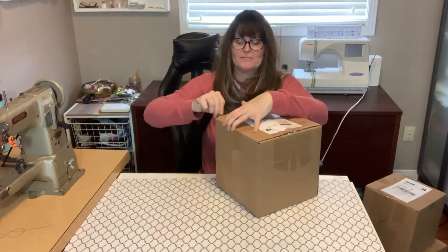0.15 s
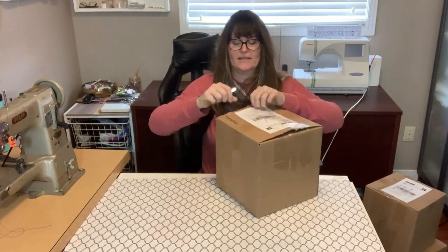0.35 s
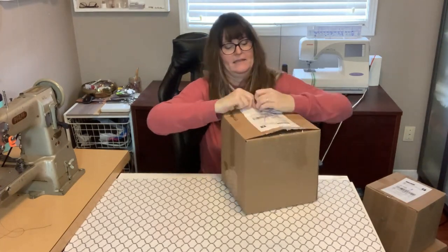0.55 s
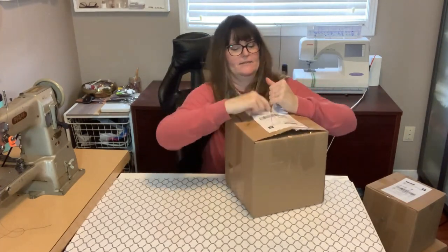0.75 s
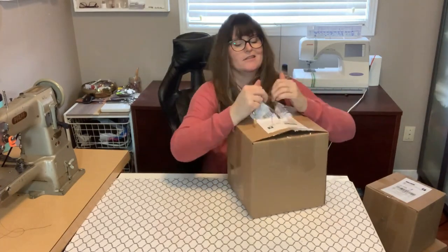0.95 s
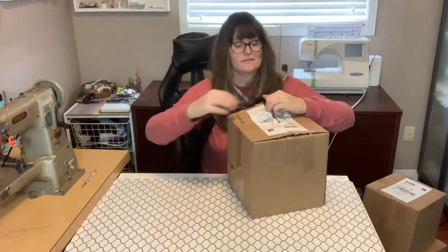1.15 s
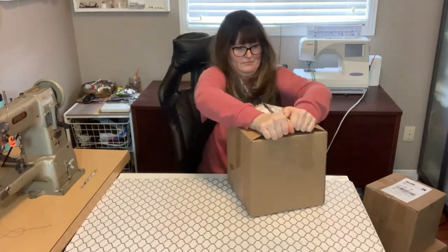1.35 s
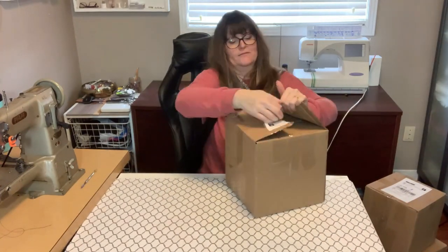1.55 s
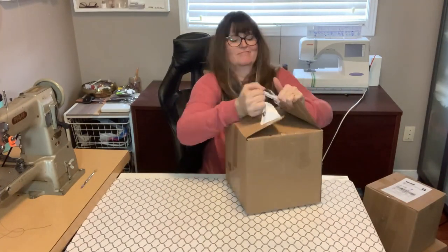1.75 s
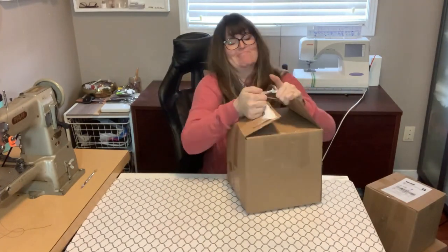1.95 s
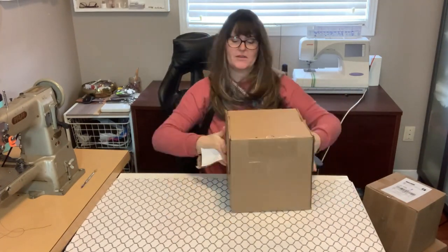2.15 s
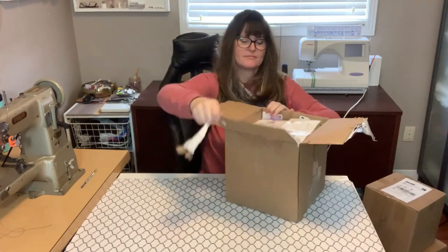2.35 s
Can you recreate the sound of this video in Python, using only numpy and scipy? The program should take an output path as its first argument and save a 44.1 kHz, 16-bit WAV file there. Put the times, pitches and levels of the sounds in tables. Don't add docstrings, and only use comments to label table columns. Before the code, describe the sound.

Close, dry indoor sound of tape being slit and ripped from a carton, with uneven crackles, short squeaks, sharp pops that lightly knock the box, and hands rubbing cardboard, heard through a stereo laptop microphone.

```python
import sys
import numpy as np
from scipy import signal
from scipy.fft import rfft, irfft
from scipy.io import wavfile
from scipy.ndimage import uniform_filter1d

SR = 44100
rng = np.random.default_rng(int(sys.argv[2]) if len(sys.argv) > 2 else 0)


def level_to_linear(level):
    exponent = np.asarray(level, float) / 20
    return 10 ** exponent


def unload_audio(sound):
    columns = np.transpose(np.atleast_2d(sound))
    steps = np.round(np.clip(columns, -1, 1) * 32767)
    wavfile.write(sys.argv[1], SR, steps.astype(np.int16))


N = 110250
TOP_HZ = 16050

# f/Hz, level/dB per Hz
FILM_SPECTRUM = [(24, -4), (40, -3), (1110, -3), (1700, -1), (2030, -3.5), (2810, 0.5), (7460, -1.5),
                 (14700, -0.5), (15800, -4.5)]


def on_log(table, hz):
    f, v = np.array(table, float).T
    return np.interp(np.log(np.maximum(hz, 1)), np.log(np.maximum(f, 1)), v)


def colour(x, table):
    cepstrum = irfft(np.log(level_to_linear(on_log(table, np.fft.rfftfreq(1024, 1 / SR)))))
    cepstrum[1:512] *= 2
    cepstrum[513:] = 0
    response = irfft(np.exp(rfft(cepstrum)))
    response /= np.sqrt(np.sum(response ** 2))
    return signal.fftconvolve(x, response[None])[:, :N]


def walk(rate):
    hold = int(SR / rate)
    levels = np.repeat(rng.standard_normal(N // hold + 1), hold)
    return 1.3 * uniform_filter1d(uniform_filter1d(levels, hold), hold)[:N]


def grit(spread_db):
    releases = rng.standard_normal((3, N)) * level_to_linear(spread_db * rng.exponential(size=N))
    return releases / np.sqrt(np.mean(releases ** 2))


def swell(t, start, length, edge):
    ramp = np.minimum(2 * (t - start), start + length - t) / (edge * length)
    return np.clip(ramp + 0.5, 0, 1) ** 2


def box_thud(strike, t):
    # f/Hz, level/dB, t60/s
    box_modes = [(674, 2, 0.039), (880, 12.5, 0.016), (2500, 23.5, 0.015), (3500, 17, 0.015)]
    u = t[:4096]
    ring = sum(level_to_linear(db - 60 * u / t60) * np.sin(2 * np.pi * hz * u) for hz, db, t60 in box_modes)
    ring /= np.sqrt(np.sum(ring ** 2))
    return signal.fftconvolve(strike, ring[None])[:, :N]


def snaps(t):
    # t/s, peak level/dB, ring t60/s, box thud level/dB, bass level/dB
    cracks = [(.499, -7.5, 0.038, -18, -4), (0.502, -9.5, 0.028, -35, -15), (0.74, -15, 0.034, -22, 4.5),
              (0.7606, -16.5, 0.022, -31, -5), (0.94, -2, 0.0092, -22, -6), (0.9701, -6, 0.0098, -22, -0.5),
              (0.9895, -7, 0.03, -29, 0.5), (1.008, -8.5, 0.021, -22, -5), (1.3205, -10.5, 0.019, -36, -3),
              (1.3232, -11.5, 0.028, -16, 1), (1.456, -6, 0.026, -16.5, -0.5), (1.866, -7.5, 0.019, -16, 0),
              (1.8669, -4.5, 0.028, -28, -4), (2.1077, -3.5, 0.02, -30, -4), (2.211, -15, 0.021, -13, 1),
              (2.236, -21.5, 0.04, -28, -6)]
    # t/s, peak level/dB
    small_snaps = [(0.002, -29), (0.1, -35.5), (0.181, -21), (0.208, -33), (0.217, -28), (0.235, -22),
                   (0.319, -19.5), (0.337, -26.5), (0.406, -23), (0.454, -18), (0.571, -26.5), (0.58, -24.5),
                   (0.599, -15), (0.698, -21.5), (0.773, -24.5), (0.780, -15), (0.855, -27), (0.9735, -11.5),
                   (1.216, -24.5), (1.246, -32), (1.254, -23), (1.302, -31.5), (1.408, -33), (1.429, -32.5),
                  (1.53, -31.5), (1.502, -28), (1.512, -22), (1.5791, -23.5), (1.6464, -28.5),
                  (1.7778, -29), (1.809, -28), (1.851, -27), (1.907, -26.5), (1.979, -25), (2.241, -19.5),
                  (2.326, -28.5), (2.343, -29.5), (2.371, -31),
                   (0.915, -35), (0.9256, -17), (0.935, -12), (0.962, -15), (0.986, -11), (1.0021, -17),
                  (1.451, -30), (1.707, -35), (1.731, -22), (1.828, -24), (2.227, -21.5), (2.106, -21)]
    small_t60_s, small_thud_db = 0.027, -23
    snap_db, tick_db, tick_s, rise_s = -5.5, 0, 0.00025, 0.00064
    bass_hz = 450

    small = [(s, db, small_t60_s, small_thud_db, 0) for s, db in small_snaps]
    film_power, knock_power, bass_power = np.zeros((3, N))
    for s, db, t60, box_db, bass_db in cracks + small:
        u = np.maximum(t - s, 0)
        ring = level_to_linear(-60 * u / max(t60, 0.004)) + level_to_linear(tick_db) * np.exp(-u / tick_s)
        env = level_to_linear(db + snap_db) * (1 - np.exp(-u / rise_s)) * ring
        film_power += env ** 2
        bass_power += (env * level_to_linear(bass_db)) ** 2
        knock_power += (env * level_to_linear(box_db)) ** 2

    burst = grit(spread_db=3.0)
    film = np.sqrt(film_power) * burst
    thud = box_thud(np.sqrt(knock_power) * burst, t)
    low_pass = signal.butter(2, bass_hz, fs=SR, output="sos")
    bass_change = signal.sosfiltfilt(low_pass, np.sqrt(bass_power) * burst - film)
    return colour(film + bass_change, FILM_SPECTRUM) + thud


def scratches(t):
    # t/s, length/s, level/dB
    peels = [(0, 0.095, -50), (0.197, 0.041, -45.5), (0.25, 0.018, -36.5), (0.261, 0.041, -48),
             (0.411, 0.037, -60.5), (0.451, 0.031, -41), (0.518, .07, -57), (0.633, 0.034, -49.5),
             (.7, 0.04, -45.5), (0.739, 0.041, -34.5), (0.843, 0.045, -44), (0.926, 0.026, -33.5),
             (0.942, 0.083, -38.5), (1.034, 0.029, -39.5), (1.063, 0.049, -45), (1.113, 0.028, -35),
             (1.156, 0.056, -40), (1.255, 0.067, -50.5), (1.339, 0.029, -46.5), (1.391, 0.045, -48.5),
             (1.593, 0.027, -40), (1.606, 0.14, -51), (1.706, 0.044, -33.5), (1.747, .035, -46.5),
             (1.789, 0.082, -43), (1.892, 0.21, -44.5), (2.115, .012, -42), (2.143, 0.024, -37),
             (2.13, 0.099, -49.5), (2.256, 0.02, -44.5)]
    env = np.sqrt(sum((level_to_linear(db) * swell(t, s, length, 0.47)) ** 2 for s, length, db in peels))
    return colour(env * level_to_linear(2.9 * walk(220)) * grit(spread_db=2.3), FILM_SPECTRUM)


def squeaks(t):
    # t/s, length/s, start f/Hz, end f/Hz, level/dB
    soft_squeaks = [(.234, 0.009, 2900, 2800, -36.5), (.718, 0.016, 2950, 2500, -46),
                    (.862, 0.03, 2500, 2120, -45.5), (1.037, 0.013, 2800, 3560, -34.5),
                    (1.062, 0.014, 2740, 2280, -39.5), (1.115, 0.017, 3500, 3830, -35),
                    (1.145, 0.011, 2500, 2450, -40.5), (1.165, 0.013, 3400, 3130, -32.5),
                    (1.195, 0.017, 2340, 2330, -37.5), (1.585, .009, 2956, 3090, -33),
                    (2.256, 0.022, 2400, 2130, -47.5), (2.24, 0.0062, 1800, 1840, -32)]
    # t/s, length/s, start f/Hz, end f/Hz, level/dB
    taut_squeaks = [
        (.2515, 0.012, 2783, 2465, -25.5),
        (.263, 0.0099, 2565, 2500, -43),
        (.702, 0.016, 2827, 2974, -24),
        (1.0815, 0.0073, 3125, 3230, -31.5),
        (1.097, 0.008, 3160, 3030, -30.5),
        (1.126, 0.012, 3500, 2410, -30),
        (1.18, .014, 3020, 2400, -31),
        (1.592, 0.0063, 3056, 3040, -25.5),
        (2.158, 0.01, 2470, 2500, -35.5),
    ]
    # t/s, length/s, start f/Hz, end f/Hz, level/dB
    shrill_squeaks = [
        (.214, 0.013, 3140, 3140, -38),
        (.454, 0.011, 2690, 2620, -25.5),
        (1.597, 0.011, 2710, 2800, -28),
        (2.2375, 0.0069, 2575, 2780, -22.5),
        (2.244, 0.0052, 2780, 2770, -24),
    ]
    soft_db = [0, -7, -15, -18, -22]
    taut_db = [-10, 0, -11, -9, -13]
    shrill_db = [-10, -9, 0, -12, -14]
    arch, wobble = 0.07, 0.014
    rough, rough_hz = 0.72, 550

    out = np.zeros((3, N))
    jitter = 1 + wobble * walk(700)
    rates = rough_hz * np.sqrt(np.arange(1, 6))
    unsteady = np.array([[walk(hz) + 1j * walk(hz) for _ in range(3)] for hz in rates]) / np.sqrt(2)
    steady = np.exp(1j * np.array([[0], [1], [-1]]))
    slip = (steady + rough * unsteady) / np.hypot(1, rough)

    kinds = ((soft_squeaks, soft_db), (taut_squeaks, taut_db), (shrill_squeaks, shrill_db))
    for rows, partial_levels in kinds:
        for s, length, start_hz, end_hz, db in rows:
            i = slice(int(max(s - length / 2, 0) * SR), int((s + length + length / 2) * SR))
            u = np.clip((t[i] - s) / length, 0, 1)
            glide = start_hz + (end_hz - start_hz) * u
            hz = glide * (1 + arch * (np.sin(np.pi * u) - 0.5)) * jitter[i]
            phase = 2 * np.pi * np.cumsum(hz) / SR
            env = swell(t[i], s, length, 0.35)
            for k, partial_db in enumerate(partial_levels):
                if (k + 1) * max(start_hz, end_hz) < TOP_HZ:
                    tone = np.imag(slip[k, :, i] * np.exp(1j * (k + 1) * phase))
                    out[:, i] += level_to_linear(db + partial_db) * env * tone
    return out


def rasps(t):
    # t/s, length/s, start f/Hz, end f/Hz, level/dB
    hoarse_squeals = [(.021, 0.033, 3200, 3700, -45.5), (.260, 0.013, 3010, 2400, -36),
                      (.273, 0.012, 3430, 3580, -36), (1.907, 0.0092, 2550, 2480, -42),
                      (.719, 0.0077, 2770, 2600, -49), (.727, 0.014, 3700, 4300, -44),
                      (1.018, .014, 3500, 3100, -45.5), (1.082, 0.025, 3230, 2880, -37),
                      (1.172, 0.018, 930, 800, -50), (1.61, 0.017, 2980, 2800, -63),
                      (1.682, 0.0044, 3260, 3120, -47), (1.723, 0.014, 4080, 3920, -27),
                      (1.725, 0.0097, 3500, 3500, -32), (1.736, 0.008, 3600, 3100, -45),
                      (2.109, .006, 890, 740, -31), (2.12, 0.015, 734, 620, -49.5),
                      (2.143, .007, 6100, 6200, -39), (2.143, 0.0093, 8200, 7760, -31),
                      (2.262, 0.0085, 6300, 6100, -42), (2.23, 0.0061, 763, 645, -46.5)]
    # t/s, length/s, start f/Hz, end f/Hz, level/dB
    broad_rasps = [(.032, 0.013, 5270, 5630, -43.5), (.046, .012, 5600, 6000, -54),
                   (.204, 0.017, 6100, 8560, -36), (.208, 0.017, 11600, 12500, -36),
                   (.291, 0.015, 3950, 3570, -43.5), (.7405, 0.0047, 3340, 3080, -30),
                   (.7615, 0.0027, 3300, 2900, -29.5), (1.456, 0.0049, 2900, 2560, -27.5),
                   (1.036, .016, 8600, 9350, -34), (1.036, .015, 13000, 13000, -30.5),
                   (1.036, .007, 5200, 6000, -42), (1.083, 0.0079, 12800, 11500, -47),
                   (1.146, 0.011, 12500, 12500, -36), (1.166, 0.033, 9900, 8900, -41.5),
                   (1.592, 0.021, 12000, 13000, -32.5), (1.65, 0.076, 2970, 3400, -56),
                   (1.703, 0.012, 5100, 5970, -35), (1.707, 0.035, 12100, 13000, -39),
                   (2.108, 0.0044, 3500, 3060, -20.5), (2.26, .014, 4340, 3600, -44.5)]
    hoarse_share, rasp_share = 0.1, 0.29

    out, noise = np.zeros((3, N)), grit(spread_db=2.0)
    for rows, share in ((hoarse_squeals, hoarse_share), (broad_rasps, rasp_share)):
        for s, length, start_hz, end_hz, db in rows:
            i = slice(int(max(s - length - 0.01, 0) * SR), int((s + 2 * length) * SR))
            hz = start_hz + (end_hz - start_hz) * np.clip((t[i] - s) / length, 0, 1)
            carrier = np.exp(2j * np.pi * np.cumsum(hz) / SR)
            half_hz = share * (start_hz + end_hz) / 4 + 70
            low_pass = signal.butter(2, half_hz, fs=SR, output="sos")
            band = np.real(carrier * signal.sosfilt(low_pass, noise[:, i] / carrier))
            out[:, i] += level_to_linear(db) * np.sqrt(SR / half_hz) * swell(t[i], s, length, 0.45) * band
    return out


def rustle(t):
    # t/s, level/dB
    handling = [(.11, -65), (.138, -76), (.146, -63), (.175, -62), (.3, -54), (.37, -65.5), (.5, -56.5),
                (.8, -46), (.835, -59), (.9, -52), (1.23, -53.5), (1.35, -55.5), (1.375, -66),
                (1.44, -50.5), (2.06, -77), (2.09, -55.5), (2.3, -51), (2.5, -53.5)]
    # f/Hz, level/dB per Hz
    rustle_spectrum = [(18, -59), (30, -4), (1870, -0.5), (2190, 2), (2770, 2), (4310, 0.5), (5580, -0.5),
                       (15000, -4.5)]
    s, db = np.array(handling).T
    flicker_db = 0.46 * walk(60) + 2.8 * walk(250)
    rubbing = colour(level_to_linear(np.interp(t, s, db) + flicker_db) * grit(spread_db=1.1), rustle_spectrum)
    low = signal.sosfilt(signal.butter(2, 1500, fs=SR, output="sos"), rubbing)
    late_rise_db = np.interp(t, [2.3, 2.42], [0, 4.0])
    return low * level_to_linear(late_rise_db + 2.0 * walk(24.86)) + (rubbing - low) * level_to_linear(2 * walk(24.74))


def two_ports(shared, left, right):
    # f/Hz, phase/rad
    port_phase = [(60, 2.4), (250, 2.17), (700, 1.1), (1400, 2.06), (2800, 0.1), (5600, 1.4), (10000, 1.62)]
    # f/Hz, level/dB
    port_db = [(60, 1), (1400, 0.5), (2800, 2), (5600, 0.25)]
    unshared = 0.58
    hz = np.fft.rfftfreq(N, 1 / SR)
    side = np.array([[0.5], [-0.5]])
    gain = level_to_linear(side * on_log(port_db, hz))
    turned = rfft(shared) * np.exp(1j * side * on_log(port_phase, hz))
    separate = rfft(np.array([left, right]))
    return irfft(gain * (np.sqrt(1 - unshared) * turned + np.sqrt(unshared) * separate), N)


def scene():
    t = np.arange(N) / SR
    return two_ports(*(snaps(t) + scratches(t) + squeaks(t) + rasps(t) + rustle(t)))


def roll_off(x):
    return signal.sosfilt(signal.butter(12, 16970, fs=SR, output="sos"), x)


def record(dry):
    rounded = 0.8 * np.tanh(dry / 0.8)
    mix = signal.sosfilt(signal.ellip(10, 0.2, 60, TOP_HZ, fs=SR, output="sos"), rounded)
    return roll_off(mix)


dry = scene()
out = record(dry)
unload_audio(out)
```